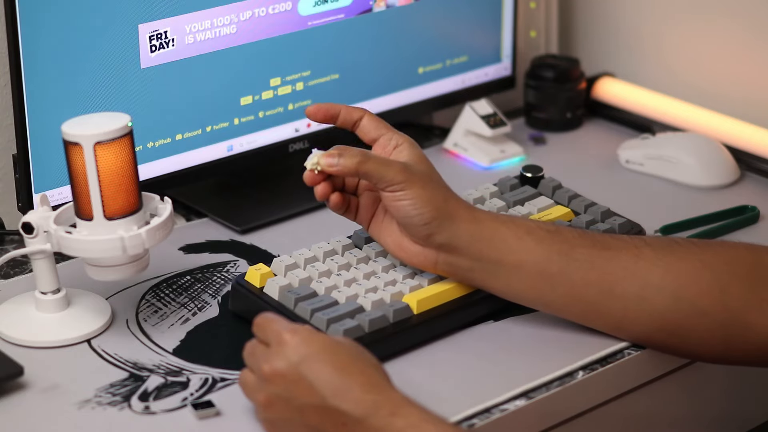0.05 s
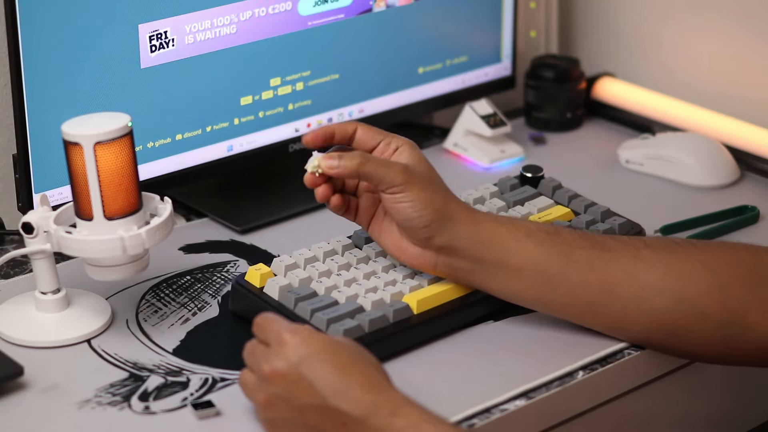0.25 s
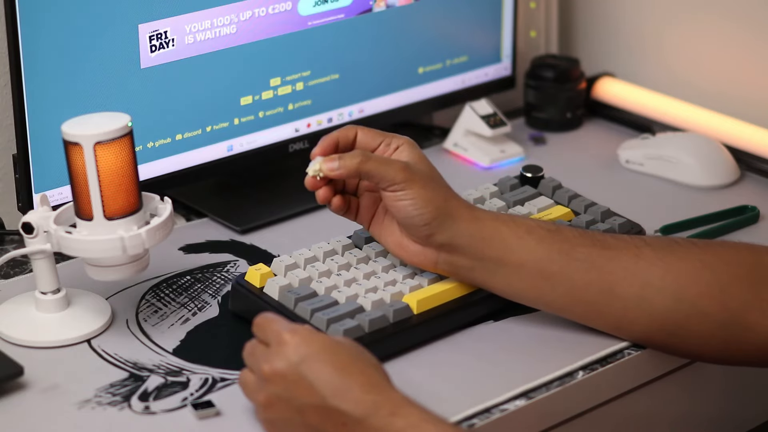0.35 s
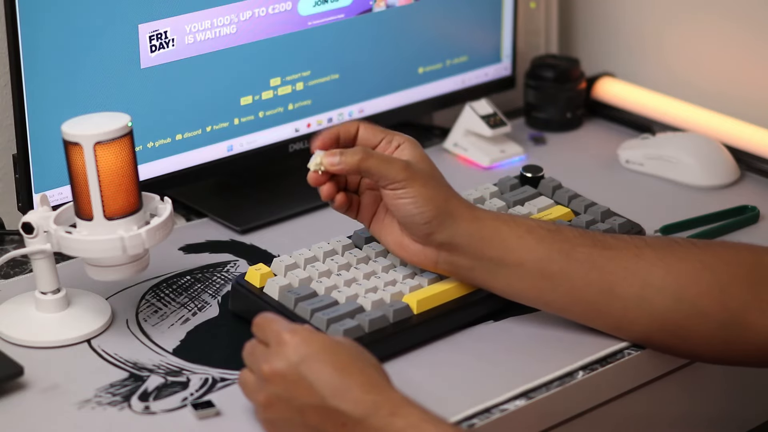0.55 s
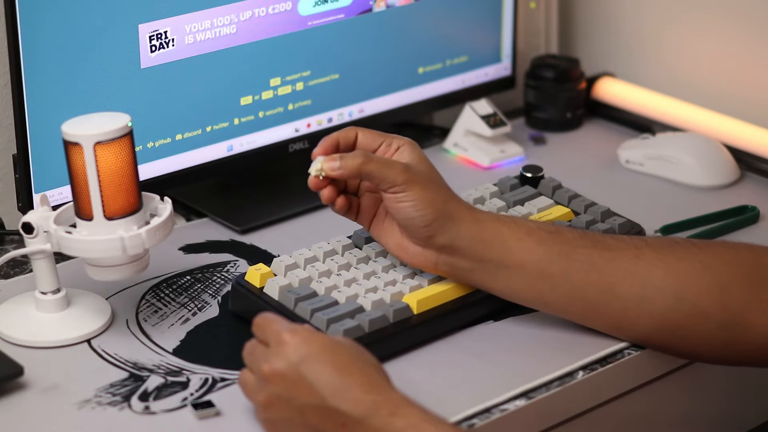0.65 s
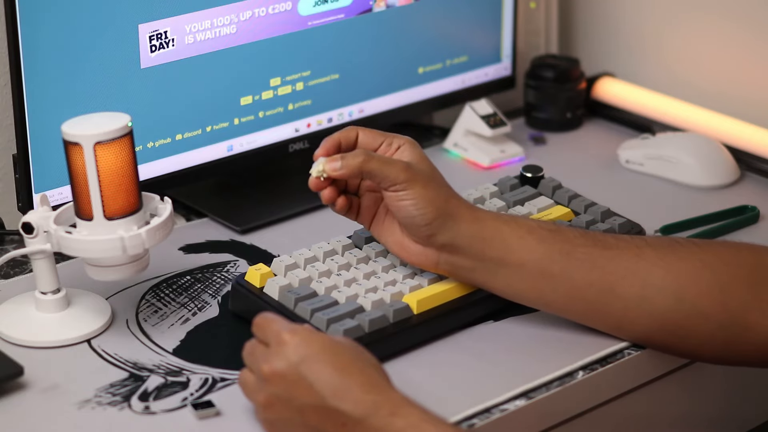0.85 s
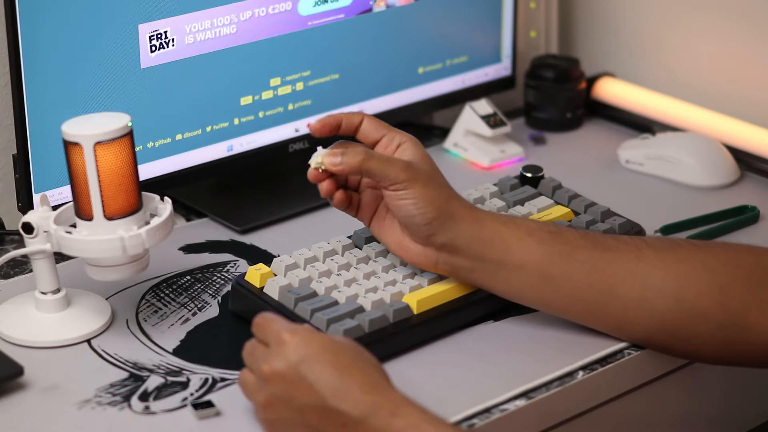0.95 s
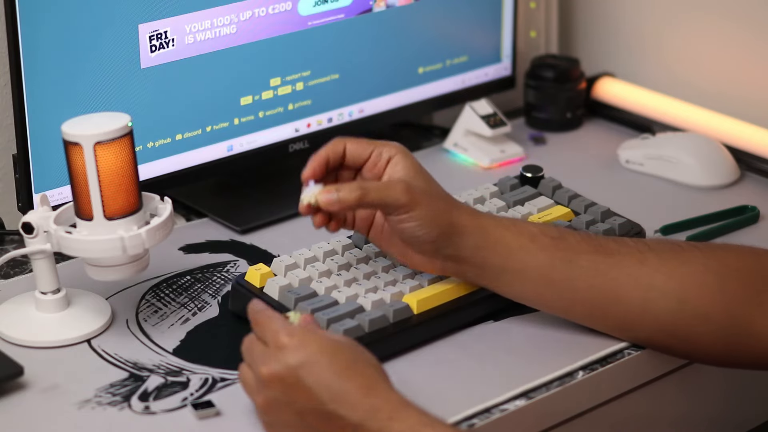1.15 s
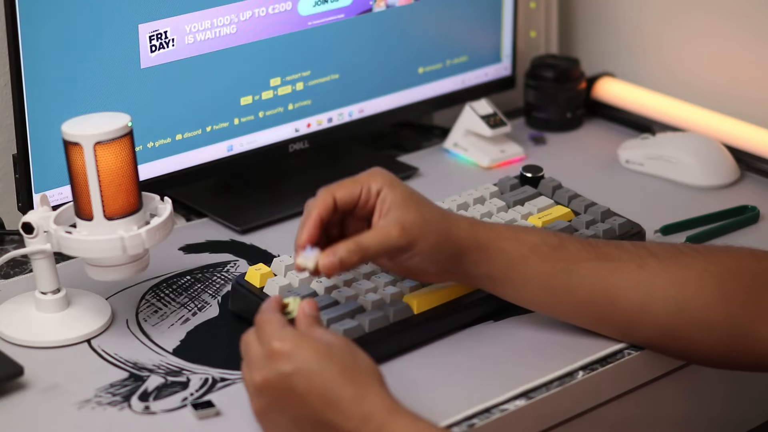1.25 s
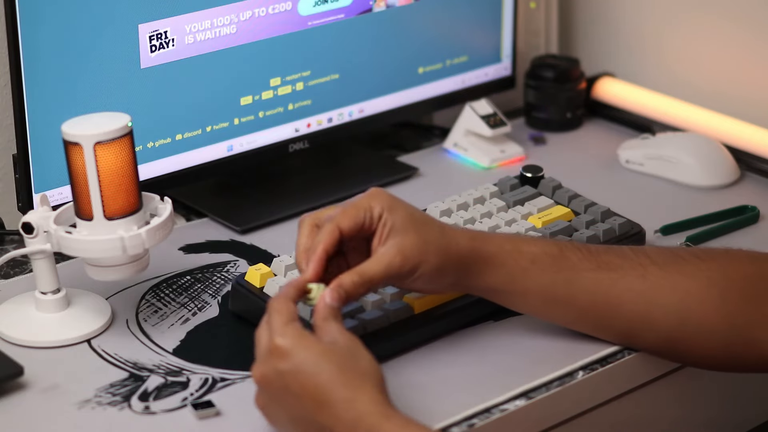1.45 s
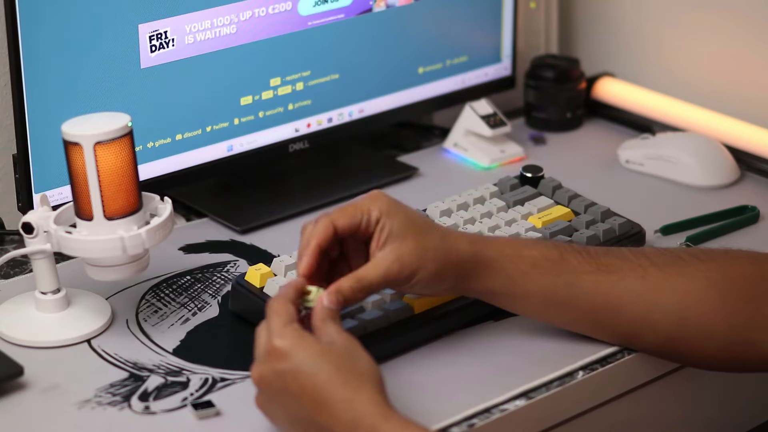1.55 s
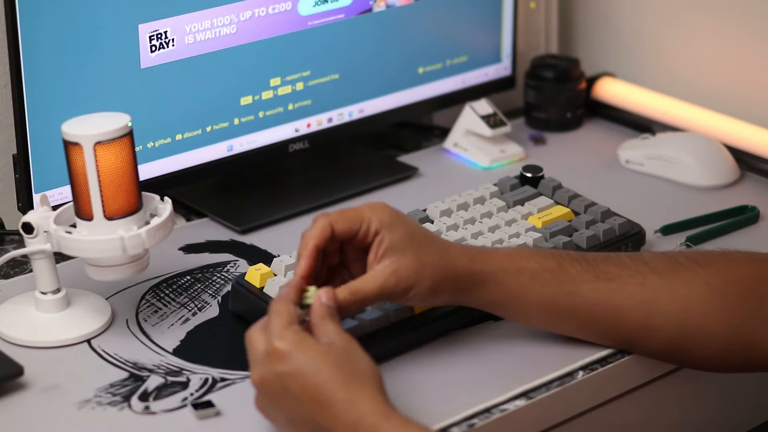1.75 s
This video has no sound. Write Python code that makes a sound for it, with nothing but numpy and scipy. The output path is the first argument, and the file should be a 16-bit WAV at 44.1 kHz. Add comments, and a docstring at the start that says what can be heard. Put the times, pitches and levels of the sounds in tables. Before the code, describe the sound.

A loose mechanical keyboard switch is pressed four times by hand, each sharp plastic clack followed by a lighter tap on release; after a pause, two small plastic shells tick together. Close microphone, small quiet room.

```python
"""A loose keyboard switch is pressed four times between finger and thumb, close to a desk microphone in a small room.
Each press is a faint slip of the stem (decaying band noise), then a sharp plastic clack with a soft low thump
(damped sines); each release is a slip and a lighter, duller tap. Later the switch ticks against a second one.
Echoes and decaying noise form the room; coloured noise and steady sines form rumble, faint hiss and hum."""
import sys
import numpy as np
from scipy import signal
from scipy.fft import rfft, irfft
from scipy.io import wavfile

SR = 44100
rng = np.random.default_rng(int(sys.argv[2]) if len(sys.argv) > 2 else 0)


def inscribe(sig):
    """Save sig as 16-bit PCM at rate SR to the path in sys.argv[1].

    A 1-D sig is mono; a 2-D sig holds one channel per row.
    Samples are clipped to [-1, 1] before scaling.
    """
    pcm = np.round(np.clip(np.atleast_2d(sig).T, -1, 1) * 32767)
    wavfile.write(sys.argv[1], SR, pcm.astype(np.int16))


N = 79380
TIME_S = np.arange(N) / SR

# stem hits the bottom: t/s, clack level/dB, clack treble tilt/(dB/octave), thump level/dB, boom level/dB
PRESSES = [(.2087, 0.8, -0.5, -0.5, 5.5), (0.433, -2.5, -0.7, -2.5, -6.5), (0.6544, -1.5, 0, -3, 2),
           (.873, 0.03, 0, -0.5, -1.5)]


def from_db(db):
    """Decibels to amplitude gain."""
    return 10 ** (np.asarray(db) / 20)


def add(out, start_s, sound):
    """Mix a sound into out at a time, cut at the end."""
    i = int(np.clip(round(start_s * SR), 0, N - 1))
    out[i:i + len(sound)] += sound[:N - i]


def dying(t_s, t60_s):
    """Exponential decay, 60 dB down at t60_s."""
    return np.exp(-np.log(1000) * t_s / t60_s)


def filtered(x, hz, kind, order=2):
    """Butterworth filter."""
    sos = signal.butter(order, np.clip(hz, 10, .48 * SR), kind, fs=SR, output="sos")
    return signal.sosfilt(sos, x)


def coloured_noise(spectrum):
    """Noise shaped by (f/Hz, level/dB) points joined over log frequency, rms 1."""
    hz, db = np.transpose(spectrum)
    bins_hz = np.maximum(np.fft.rfftfreq(N, 1 / SR), 1)
    gain = from_db(np.interp(np.log(bins_hz), np.log(hz), db))
    noise = irfft(rfft(rng.standard_normal(N)) * gain, N)
    return noise / noise.std()


def struck(modes, pitch=1):
    """One blow: damped sines of alternating sign, each with a slightly varied strength."""
    spread_db = .4
    longest_t60_s = max(t60_s for _, _, t60_s in modes)
    t_s = TIME_S[:int(2 * SR * longest_t60_s)]
    blow = np.zeros(len(t_s))
    for k, (hz, db, t60_s) in enumerate(modes):
        gain = from_db(db + spread_db * rng.standard_normal())
        blow += (-1) ** k * gain * np.sin(2 * np.pi * hz * pitch * t_s) * dying(t_s, t60_s)
    return blow


def background():
    """Room rumble and faint hiss as coloured noise, hum as sines of random phase."""
    # steady noise spectrum, relative: f/Hz, density/dB
    floor = [(20, -4), (45, -1), (75, -1), (110, -7.5), (150, -9), (230, -12), (340, -13.5), (550, -19),
             (1200, -27), (2500, -30), (5000, -34.5), (7200, -36.5), (8100, -32.5), (9500, -40),
             (16000, -40.5)]
    # hum of the desk equipment: f/Hz, rms level/dB
    hum_lines = [(49.4, -72), (74.4, -71.5), (152, -77), (365, -83.5), (794, -87.5)]
    floor_rms_db = -64.5
    hum = np.zeros(N)
    for hz, rms_db in hum_lines:
        hum += from_db(rms_db) * np.sqrt(2) * np.sin(2 * np.pi * (hz * TIME_S + rng.random()))
    return from_db(floor_rms_db) * coloured_noise(floor) + hum


def leaf_slips():
    """The stem slips past the contact leaf: a tiny decaying scrape of band noise before an end stop."""
    # t/s, level before decay and bass cut/dB, lowest f/Hz, highest f/Hz
    slips = [(0.2054, -40.5, 2970, 9000), (.426, -56.5, 4020, 11000), (0.6486, -51, 2930, 7300),
             (0.868, -43.5, 2800, 9500), (0.3183, -51, 5450, 14000), (0.5366, -48, 6500, 15000),
             (0.7561, -47, 6000, 15000), (0.9936, -48, 2210, 3000), (.9966, -53, 7000, 15000)]
    decay_s = 0.00084  # to 1/e
    out, t_s = np.zeros(N), TIME_S[:SR // 50]
    for start_s, db, low_hz, high_hz in slips:
        noise = rng.standard_normal(2 * len(t_s))
        scrape = filtered(noise, [low_hz, high_hz], "band")[len(t_s):]  # filter onset dropped
        add(out, start_s, from_db(db) * scrape / scrape.std() * np.exp(-t_s / decay_s))
    return out


def thumps():
    """Each press jolts the hand, and low room modes boom faintly after it."""
    # hand as the stem stops: f/Hz, level/dB, t60/s
    thump_modes = [(131.7, -49.5, 0.07), (204.5, -47, 0.053), (400, -54, 0.034)]
    # room: f/Hz, level/dB, t60/s
    boom_modes = [(47.64, -57, 0.87), (73, -56.5, 0.43)]
    thump_lead_s, boom_delay_s = .003, 0.0314
    out = np.zeros(N)
    for hit_s, _, _, thump_db, boom_db in PRESSES:
        add(out, hit_s - thump_lead_s, from_db(thump_db) * struck(thump_modes))
        add(out, hit_s + boom_delay_s, from_db(boom_db) * struck(boom_modes))
    return out


def stem_hits(hits, modes):
    """The stem strikes an end stop and housing modes ring for milliseconds; tilt sets each hit's brightness."""
    pivot_hz = 5000  # tilt leaves this frequency unchanged
    out = np.zeros(N)
    for hit_s, level_db, tilt_db, *_ in hits:
        tilted = [(hz, db + level_db + tilt_db * np.log2(hz / pivot_hz), t60_s) for hz, db, t60_s in modes]
        add(out, hit_s, struck(tilted))
    return out


def press_clacks():
    """The stem hits the bottom and excites the housing."""
    # housing struck at the bottom: f/Hz, level before bass cut/dB, t60/s
    bottom_modes = [(2080, -30, 0.0021), (3720, -12.5, 0.0015), (4900, -15, 0.003), (6247, -20, 0.0031),
                    (7290, -13.5, 0.002), (8620, -17.5, 0.0033), (11650, -28, 0.0048), (13013, -35, 0.0047),
                    (15110, -35, .0024)]
    return stem_hits(PRESSES, bottom_modes)


def release_taps():
    """The spring throws the stem back to the top, exciting weaker modes."""
    # t/s, level/dB, treble tilt/(dB/octave)
    releases = [(.3289, 0, -0.5), (.5449, 1.5, -1), (.7659, 1.35, 1), (1.0078, 0.2, 2)]
    # housing struck at the top: f/Hz, level before bass cut/dB, t60/s
    top_modes = [(2286, -32, 0.0022), (3698, -29.5, 0.0023), (5100, -34.5, 0.0033), (6440, -33.5, 0.0018),
                 (8470, -39.5, 0.0028), (10730, -52, 0.006), (12600, -44, 0.0013)]
    return stem_hits(releases, top_modes)


def shell_touches():
    """Two plastic shells tick together; a lower contact cut-off makes a duller tick."""
    # t/s, level/dB, pitch factor, contact cut-off/Hz
    touches = [(1.5563, -9, 1.01, 14000), (1.5665, -15, 1.45, 5500), (1.5688, -14, 1.15, 4500),
               (1.571, -9.5, 1.02, 4200), (1.6217, -24, 1.2, 5900), (1.6252, 0.5, 1.028, 16500),
               (1.6356, -13, 1.4, 5460), (1.7007, -23, 1.15, 5570)]
    # housing struck from outside, at pitch factor 1: f/Hz, level before filters/dB, t60/s
    shell_modes = [(3910, -33, 0.0034), (4870, -36.5, 0.0023), (7460, -43.5, 0.0047), (8400, -45, 0.0039),
                   (10530, -44.5, 0.0036), (13700, -38.5, 0.0022), (15200, -50, 0.0012)]
    out = np.zeros(N)
    for start_s, db, pitch, cutoff_hz in touches:
        add(out, start_s, from_db(db) * filtered(struck(shell_modes, pitch), cutoff_hz, "low"))
    return out


def straight_path(x):
    """Direct sound from fingers to microphone, with narrow cancellations as notches."""
    # f/Hz, width/Hz
    notches = [(2670, 620), (7840, 260), (9230, 520), (12150, 210)]
    for hz, width_hz in notches:
        b, a = signal.iirnotch(hz, hz / width_hz, SR)
        x = signal.lfilter(b, a, x)
    return x


def room(x):
    """Convolve with single echoes, quick scatter from things on the desk, and the tail of the room."""
    # reflections from desk and keyboard: delay/s, level/dB
    echoes = [(.0034, -27.5), (.0052, -30), (.0072, -29), (.0100, -30.5)]
    # colour of the scattered sound, relative: f/Hz, level/dB
    colour = [(300, -1), (2200, -2), (3500, -3.5), (4600, -1.5), (5900, 7.5), (7300, -2.5), (8300, -1.5),
              (9100, -2.5), (10300, 3), (11500, -8), (12800, 0.5), (16000, -1)]
    # desk scatter, room tail: delay/s, energy/dB, t60/s
    tails = [(0.0022, -16, 0.056), (.018, -19, 0.29)]
    response = np.zeros(N)
    for delay_s, db in echoes:
        add(response, delay_s, from_db([db]))
    for delay_s, db, t60_s in tails:
        tail = coloured_noise(colour) * dying(TIME_S, t60_s)
        add(response, delay_s, from_db(db) * tail / np.linalg.norm(tail))  # unit energy, then level
    return signal.fftconvolve(x, response)[:N]


def scene():
    """The small housing radiates little bass; one microphone feeds both channels."""
    touch_room_db = -1.5  # touches are a little drier than presses
    switch = leaf_slips() + press_clacks() + release_taps()
    switch, touches = filtered([switch, shell_touches()], hz=1500, kind="high")  # bass cut
    direct = straight_path(switch + touches)
    reflected = room(switch + from_db(touch_room_db) * touches)
    mono = direct + reflected + thumps() + background()
    return np.array([mono, mono])


def record(dry):
    """Steep elliptic low-pass cuts the top."""
    cutoff_hz = 16300
    sos = signal.ellip(10, .1, 70, cutoff_hz, fs=SR, output="sos")  # ripple/dB, stopband/dB
    return signal.sosfilt(sos, dry)


dry = scene()
out = record(dry)
inscribe(out)
```